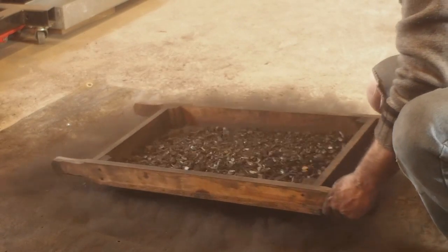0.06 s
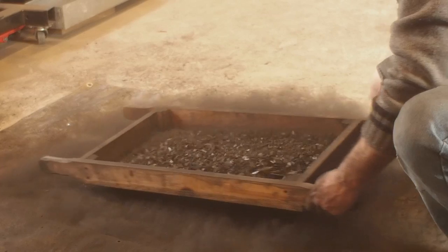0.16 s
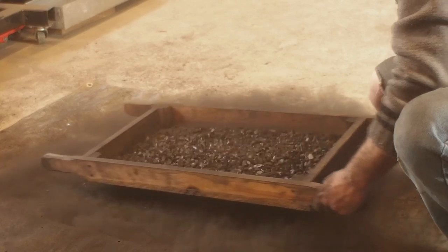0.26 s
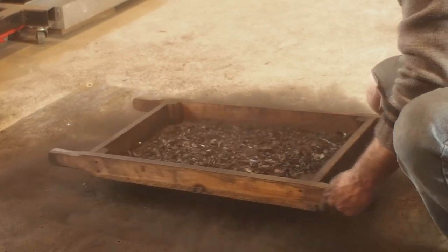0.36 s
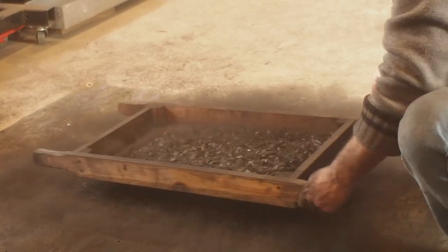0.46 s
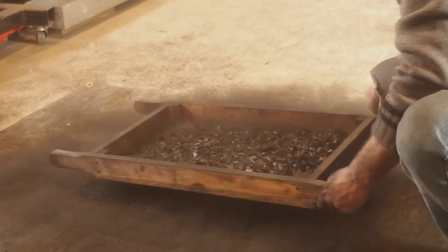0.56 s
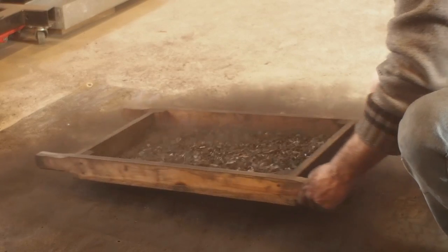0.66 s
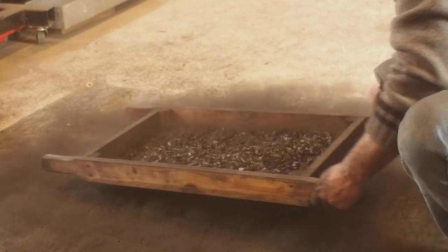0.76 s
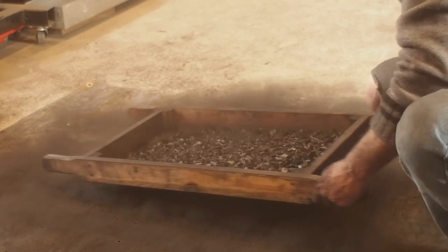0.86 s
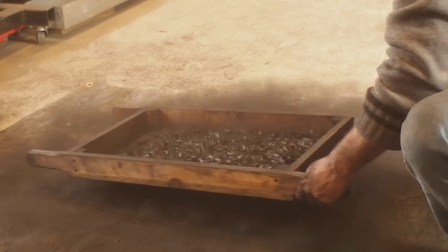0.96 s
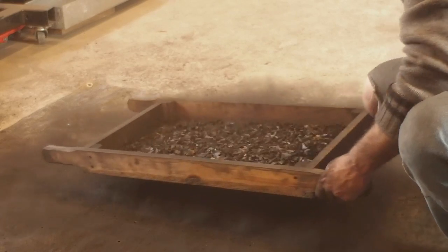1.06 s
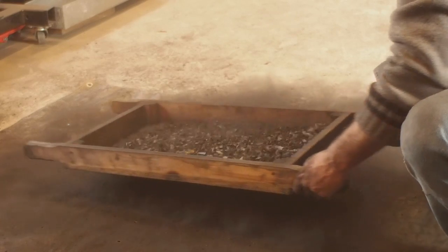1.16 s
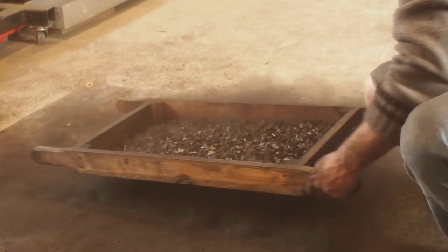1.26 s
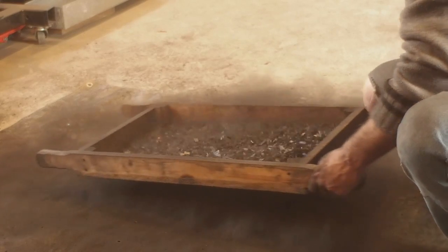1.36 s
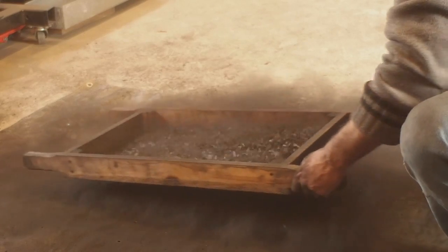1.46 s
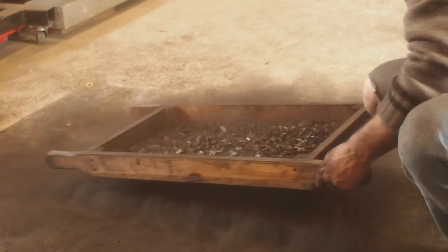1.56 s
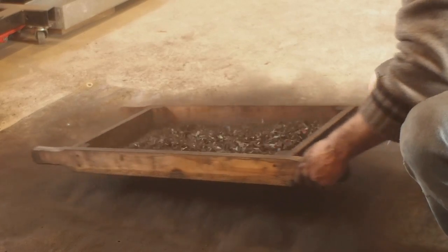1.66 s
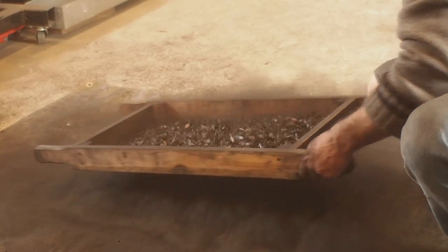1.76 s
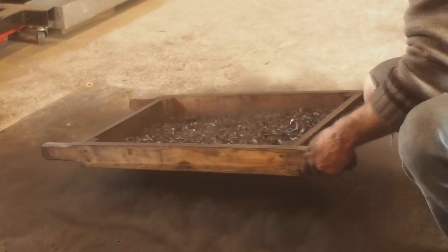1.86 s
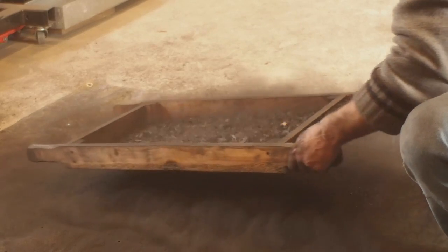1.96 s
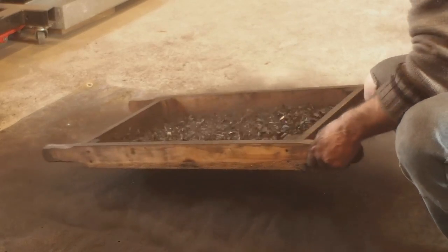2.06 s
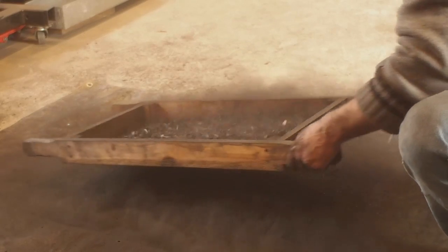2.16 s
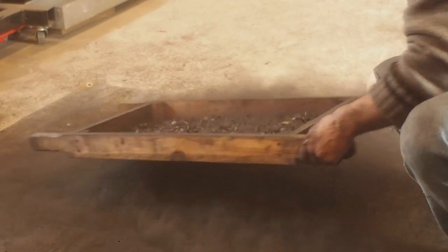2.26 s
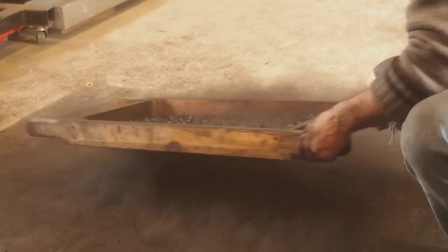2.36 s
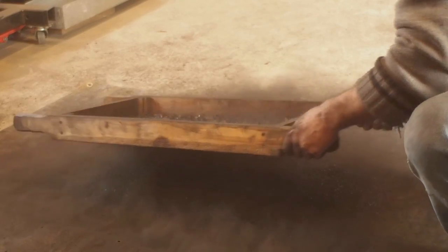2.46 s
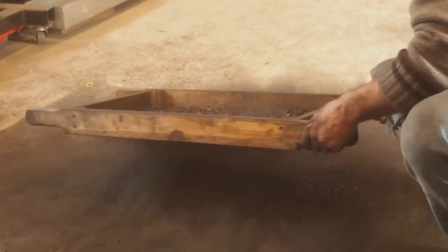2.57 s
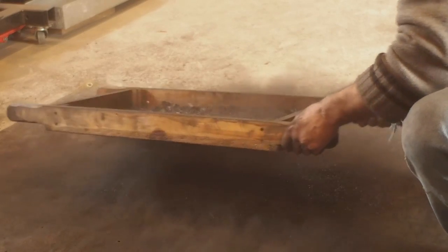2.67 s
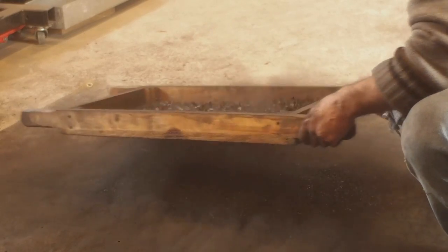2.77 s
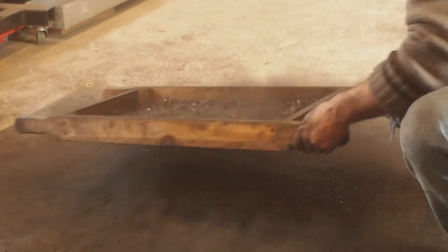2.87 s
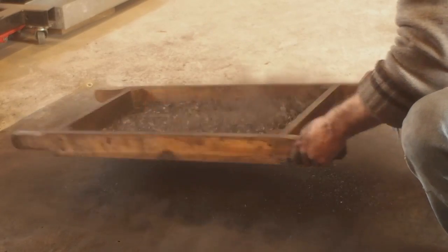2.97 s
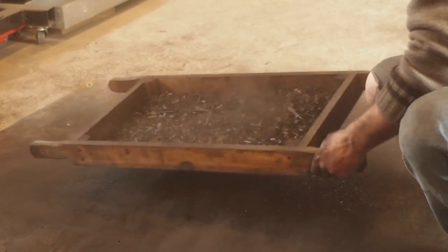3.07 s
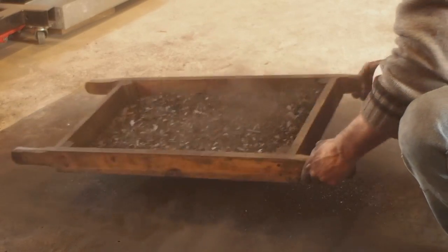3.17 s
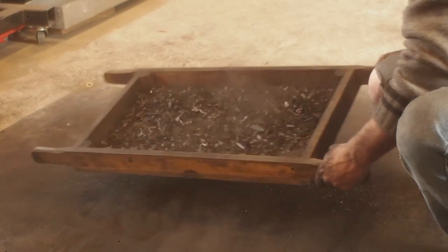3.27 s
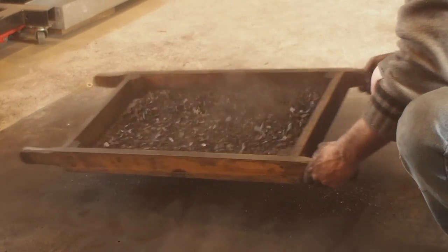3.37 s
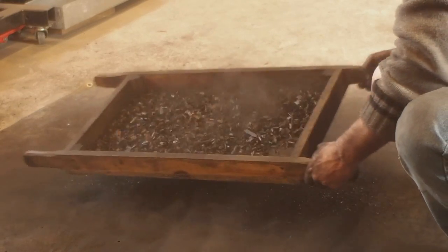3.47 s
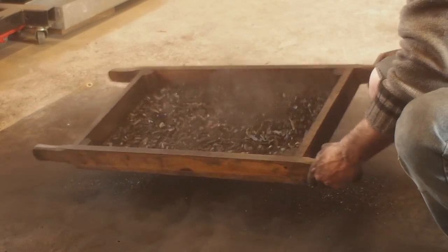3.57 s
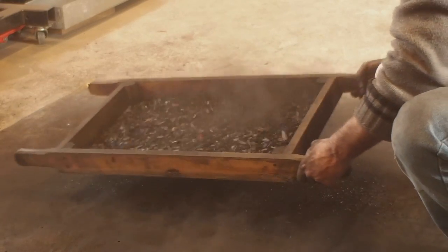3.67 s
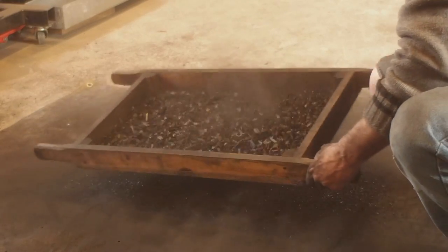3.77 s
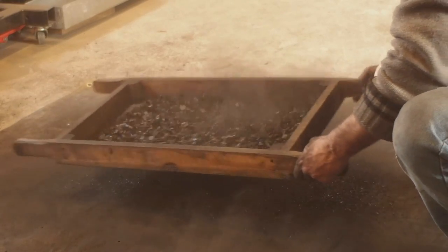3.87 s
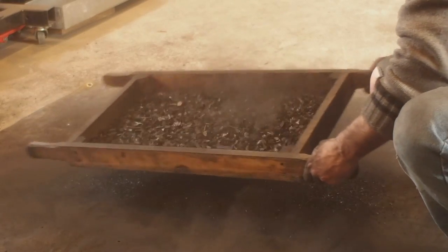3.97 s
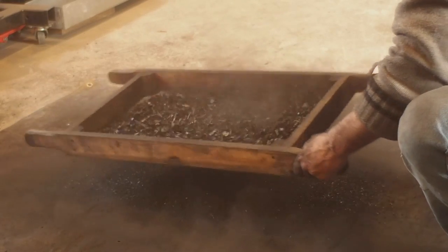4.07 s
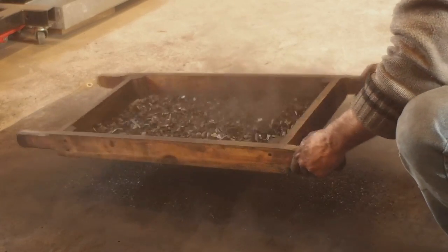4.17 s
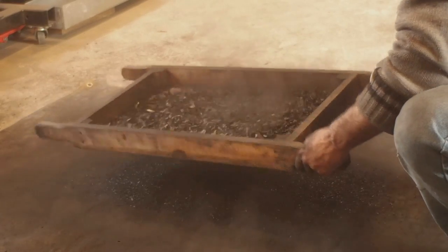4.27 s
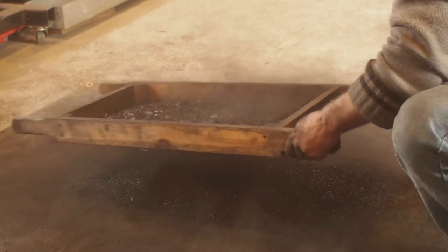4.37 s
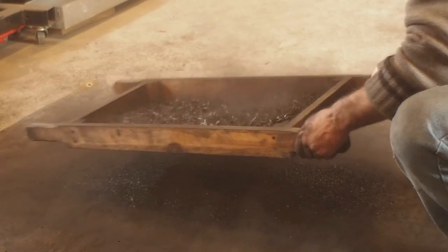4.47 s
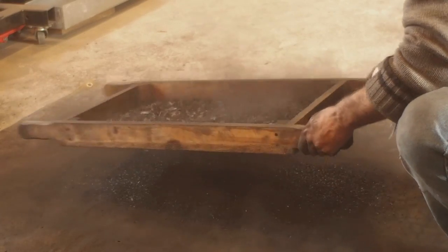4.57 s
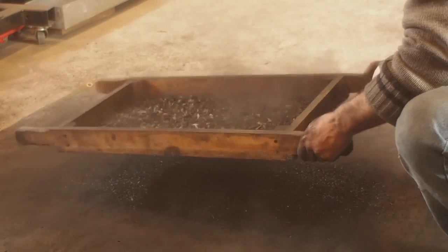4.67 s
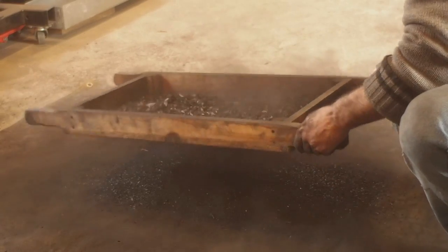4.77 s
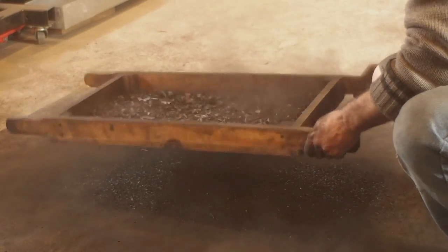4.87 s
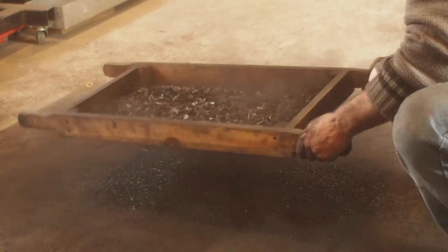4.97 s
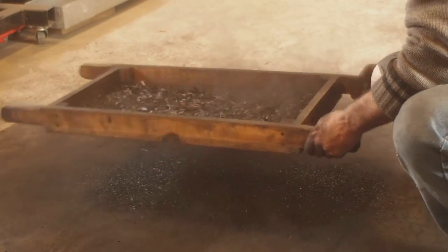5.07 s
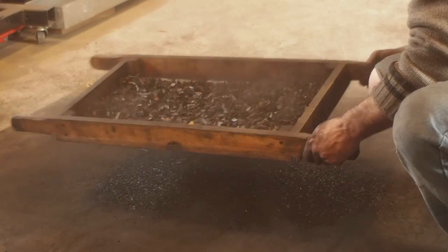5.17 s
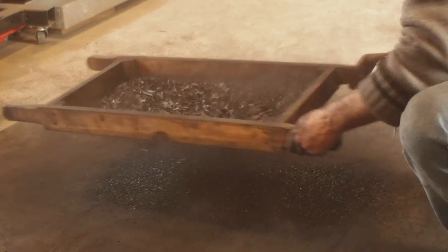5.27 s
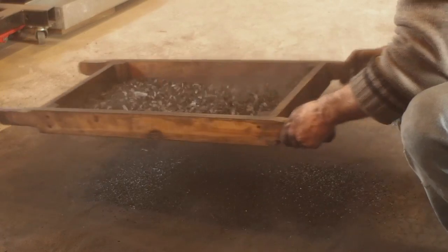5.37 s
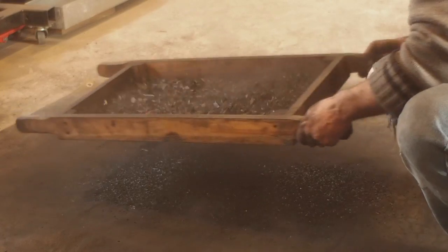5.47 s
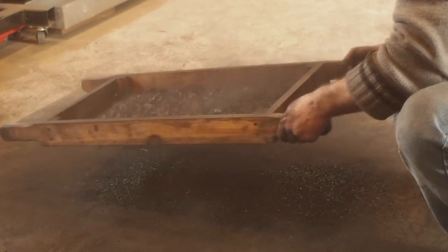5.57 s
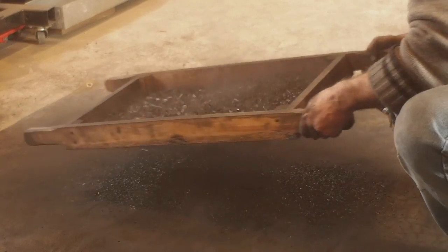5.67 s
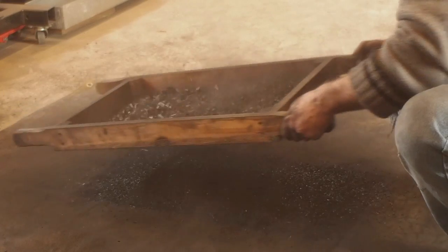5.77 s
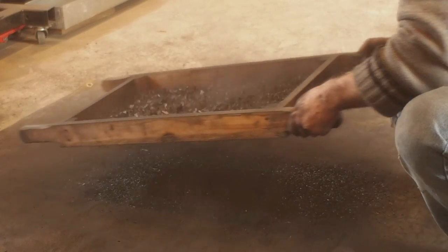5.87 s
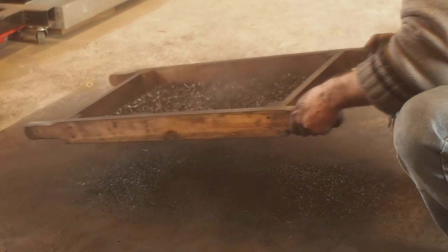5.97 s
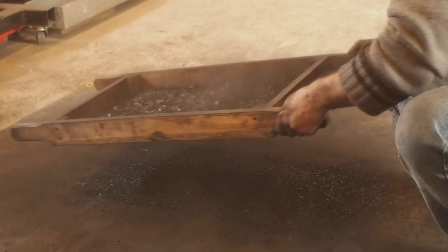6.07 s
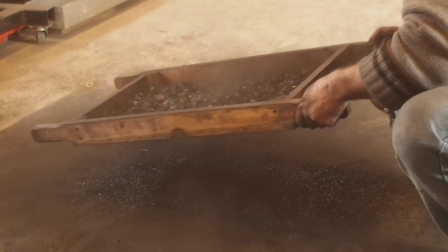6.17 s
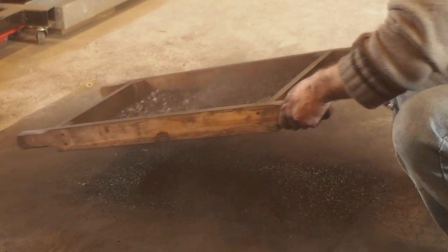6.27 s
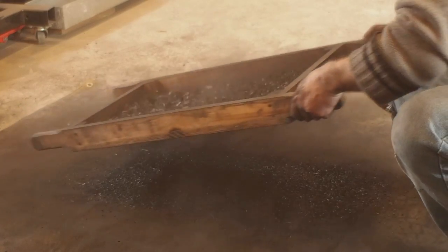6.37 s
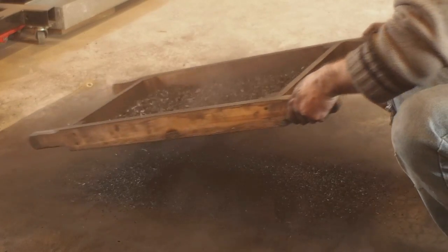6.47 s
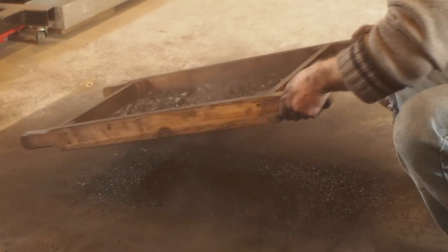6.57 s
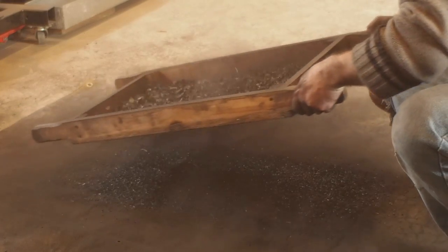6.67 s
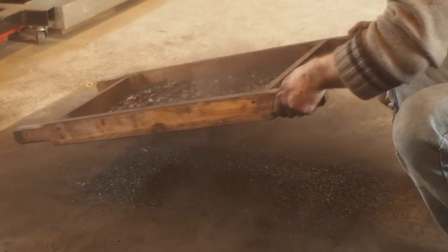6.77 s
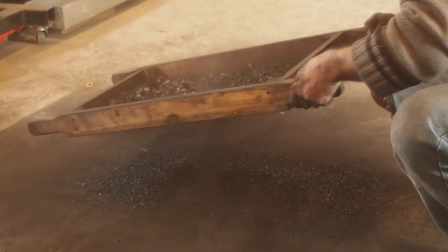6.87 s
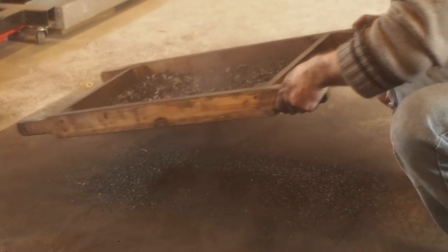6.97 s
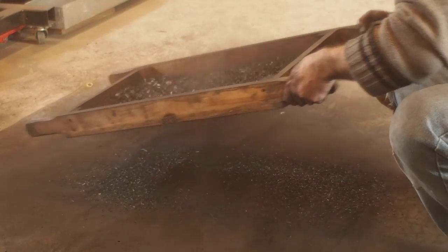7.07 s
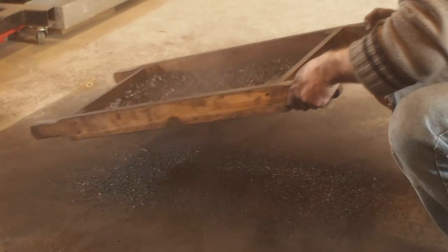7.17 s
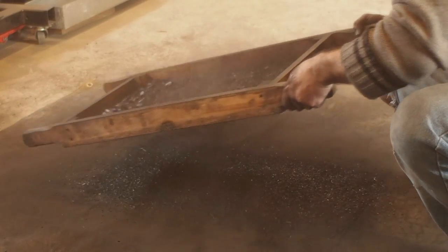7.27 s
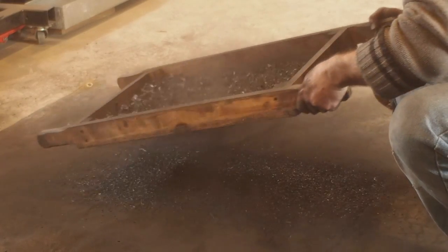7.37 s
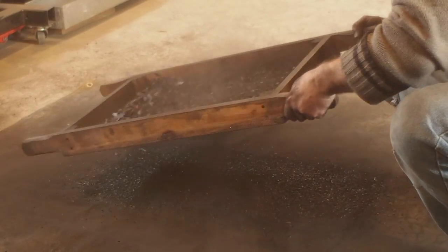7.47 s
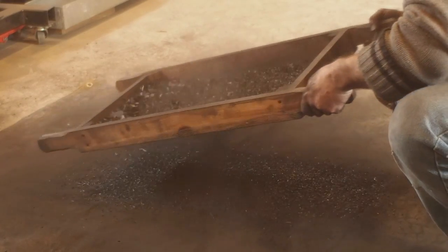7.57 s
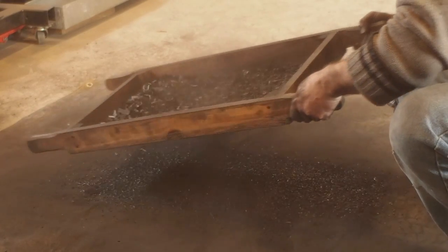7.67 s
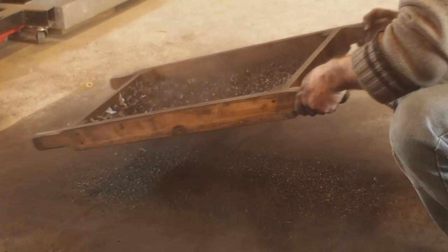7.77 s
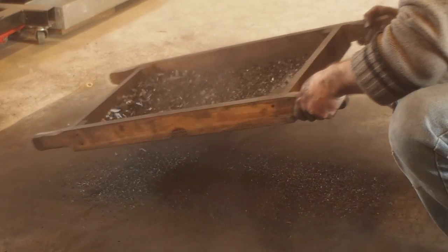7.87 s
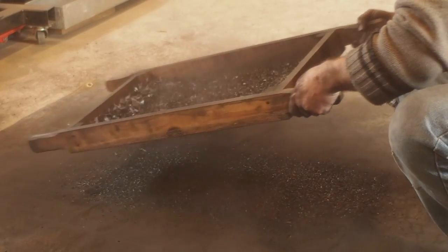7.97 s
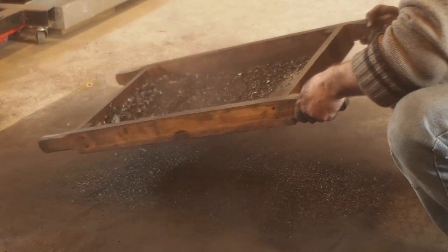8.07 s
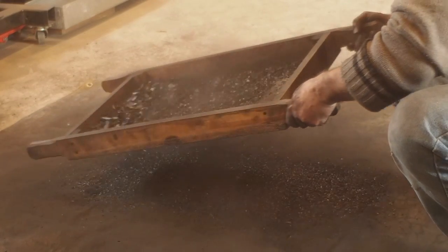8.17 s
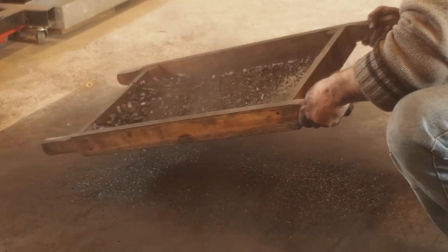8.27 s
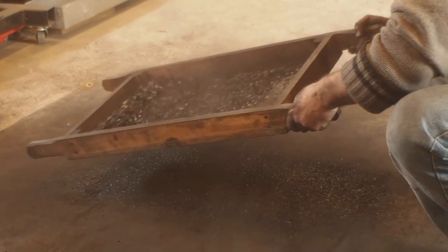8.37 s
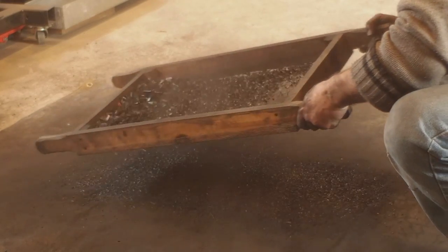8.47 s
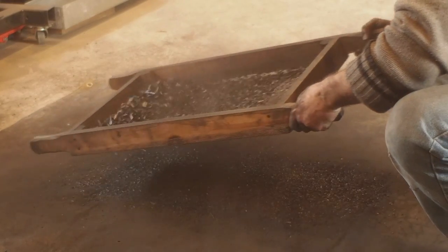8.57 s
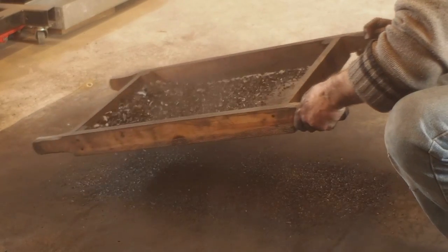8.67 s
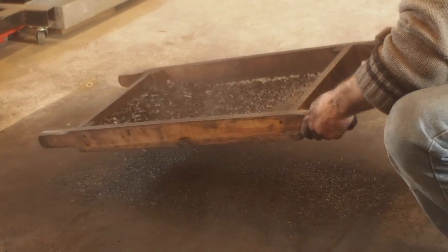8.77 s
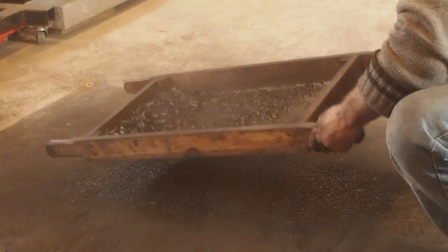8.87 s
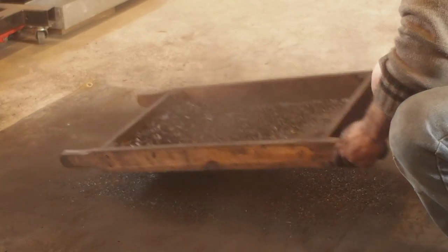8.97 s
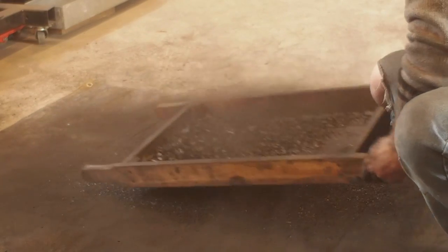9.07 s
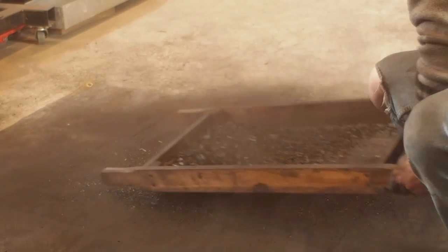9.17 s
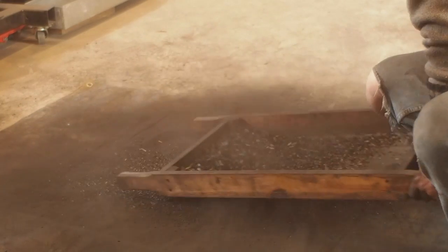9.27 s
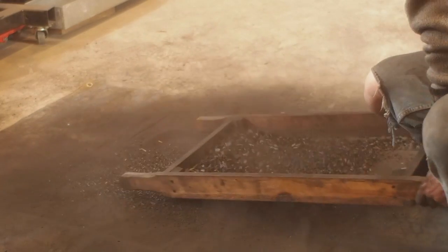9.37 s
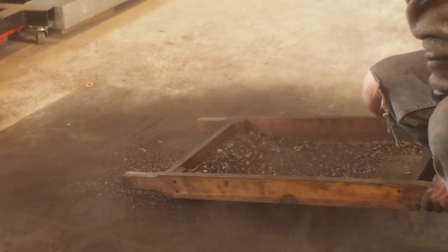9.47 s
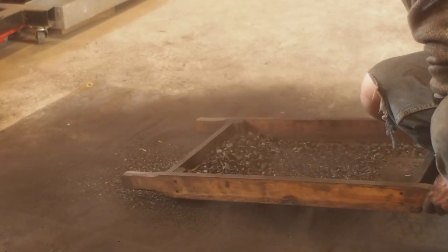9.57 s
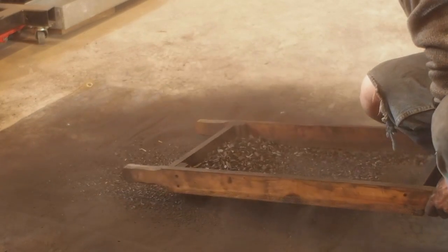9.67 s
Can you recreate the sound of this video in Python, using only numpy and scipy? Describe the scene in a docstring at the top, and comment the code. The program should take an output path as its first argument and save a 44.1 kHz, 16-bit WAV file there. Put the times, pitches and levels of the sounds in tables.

```python
"""Sieving charcoal in a workshop

Chopped charcoal is shaken in a wooden-framed sieve, about eight throws a second. Each throw sets off
a shower of collisions: lumps clink, fines hiss through the mesh, screen and frame ring. The shaking
stops, a few pieces tick, and the load slides once more as the sieve is lowered. Ventilation drones."""
import sys
import numpy as np
from scipy import signal
from scipy.fft import rfft, irfft
from scipy.io import wavfile

SR = 44100
rng = np.random.default_rng(int(sys.argv[2]) if len(sys.argv) > 2 else 0)


def transcribe(u):
    """Save the signal u as a 16-bit wav file named by the first command-line argument.

    u: samples, shape (n,) or (channels, n), limited to [-1, 1]; the rate is SR.
    q: integer samples, one column per channel.
    """
    v = np.clip(np.atleast_2d(u).T, -1, 1)
    q = np.round(v * 32767).astype(np.int16)
    wavfile.write(sys.argv[1], SR, q)


N = 429093
TIME = np.arange(N) / SR


def amp(db):
    """Decibels to gain."""
    return 10 ** (np.asarray(db) / 20)


def curve(points, t):
    """An automation curve's value at time t."""
    return np.interp(t, *np.transpose(points))


def spectrum_at(points, hz):
    """A spectrum's value at hz, on a log-frequency axis."""
    point_hz, value = np.transpose(points)
    return np.interp(np.log(hz + 1), np.log(point_hz + 1), value)


def coloured(x, eq, modes):
    """Minimum-phase filter of unit energy: a broad EQ curve with resonances on it."""
    hz = abs(np.fft.fftfreq(8192, 1 / SR))
    modes_db = sum(lift / (1 + (2 * (hz - pitch) / width) ** 2) for pitch, width, lift in modes)
    log_gain = np.log(amp(spectrum_at(eq, hz) + modes_db))
    response = np.exp(np.conj(signal.hilbert(log_gain)))
    ring = np.fft.ifft(response).real[:len(hz) // 2]
    return signal.oaconvolve(x, ring[None] / np.linalg.norm(ring), axes=1)[:, :N]


def band(x, low_hz, high_hz, passes=1):
    """A gentle band-pass, steeper with each pass."""
    sos = signal.butter(1, [low_hz, high_hz], "band", fs=SR, output="sos")
    return signal.sosfilt(np.tile(sos, (passes, 1)), x)


def clinks(low_hz, high_hz, sharpness, click, lag_s=3.2e-5, count=1500, size=192):
    """A palette of stereo clinks, (2, count, size): a click and a short ring each, white on average."""
    hz = np.fft.rfftfreq(size, 1 / SR) + 1
    register, ring_length, pan = rng.random((count, 3)).T[:, :, None]
    pitch_hz = low_hz * (high_hz / low_hz) ** register
    # rough faces touch at several points within a moment
    contact_decay = np.exp(-np.arange(size) / (SR * 0.00057))
    contact = rfft(rng.standard_normal((count, size)) * contact_decay) / np.sqrt(10)
    ring = 1 / (1 + 1j * sharpness * (.5 + ring_length) * (hz / pitch_hz - pitch_hz / hz))
    clink = click * contact + ring
    clink /= np.sqrt(np.mean(abs(clink) ** 2, 0))
    # each piece lies elsewhere on the screen, so it reaches one ear first
    ears = np.array([-.5, .5])[:, None, None]
    arrival_s = size / SR / 20 + ears * lag_s * rng.laplace(size=(count, 1))
    panned = clink * (1 + .5 * ears * (pan - .5))
    return irfft(panned * np.exp(-2j * np.pi * hz * arrival_s))


def shower(power, palette, per_s, spread_db, crowding=.25):
    """Random collisions: a harder shake brings both more of them and stronger ones."""
    chance = np.minimum(per_s / SR * (power / power.mean()) ** crowding, 1)
    onsets = np.flatnonzero(rng.random(N) < chance)
    piece = rng.integers(0, palette.shape[1], N)[onsets]
    heft_db = spread_db * np.clip(rng.standard_normal(N), -2, 2)
    blow = (amp(heft_db) * rng.choice([-1, 1], N))[onsets]
    force = blow / blow.std() * np.sqrt(power[onsets] / chance[onsets])
    samples = (onsets[:, None] + np.arange(palette.shape[2])).ravel()
    return np.array([np.bincount(samples, (force[:, None] * ear[piece]).ravel(), N)[:N]
                     for ear in palette])


# the sieve tips away from the hands: time_s, tilt (0-1)
SIEVE_TILT = [(0, 0.07), (5.3, 0), (6.3, .75), (8.3, 1)]
# the rhythm of the arms, one row a stroke: start_s, out_accent_db, back_accent_db
ARM_STROKES = [(-0.019, 1.5, 0), (0.233, 0, 1.5), (0.484, 0, -0.5), (0.727, 0, 1), (0.98, -1.0, 0.5),
               (1.229, 0.5, 0), (1.483, 1, 0.0), (1.736, 1, -1.5), (1.979, 1.0, -1.5), (2.224, 0, 0.0),
               (2.468, -1.0, 0), (2.714, -1.5, 0), (2.956, 1.0, -1.5), (3.205, 0, -1), (3.449, 0, -1.5),
               (3.682, 0.0, -1.5), (3.92, 0, -0.5), (4.171, 0.5, -0.5), (4.412, 1, 1.5), (4.66, -1.5, 2),
               (4.894, -0.5, 0.5), (5.128, 0, 0.5), (5.361, 1, 0.5), (5.598, 1, -2), (5.844, -1, -2.5),
               (6.083, 0, -4.5), (6.328, -0.5, -4.5), (6.57, -0.5, -4.5), (6.804, -1, -4.0),
               (7.037, 0, -3.5), (7.273, 0.0, -5.0), (7.501, -0.5, -4.5), (7.732, 0.0, -4.5),
               (7.958, 0.0, -6.5), (8.185, 0.0, -4.5), (8.409, 0.5, -3.5), (8.626, 1.5, -2)]
def throws(back_share=0.536, tilted_sooner_share=0.068):
    """Throw times and accents: the load flies out, and back half a stroke later, sooner when tilted."""
    out_s, out_db, back_db = np.transpose(ARM_STROKES)
    stroke_s = np.gradient(out_s)
    back_s = out_s + stroke_s * (back_share - tilted_sooner_share * curve(SIEVE_TILT, out_s))
    return np.r_[out_s, back_s], np.r_[out_db, back_db]


def surges(t, rise_s, fall_s, sliding_db, steepness=2.44):
    """Relative power: each throw swells and dies away over a bed of steady sliding."""
    throw_s, accent_db = throws()
    since_s = t - throw_s[:, None]
    width_s = np.where(since_s < 0, rise_s, fall_s)
    swells = np.exp(-.5 * abs(since_s / width_s) ** steepness)
    return amp(accent_db) ** 2 @ swells + amp(sliding_db) ** 2


# fader rides as effort and load change: time_s, lumps_db, fines_db, frame_db
SHAKE_EFFORT = [(0.0, -42.5, -42.5, -55.5), (0.45, -39.5, -39.5, -55), (1.3, -38, -38, -54.5),
                (1.85, -39.0, -38.0, -55.5), (2.25, -37.5, -37.0, -54.5), (2.95, -38.5, -38, -57.5),
                (3.4, -37, -35, -55), (4.2, -37, -36.5, -57), (4.7, -40.5, -38, -60),
                (5.05, -42.5, -38, -60), (5.35, -37.5, -34.5, -56), (6.0, -36.0, -34.5, -54.0),
                (6.45, -36.5, -35.5, -55), (7.25, -37.5, -36.5, -55), (7.7, -39, -37, -55.5),
                (8.35, -41, -39, -59), (8.65, -46, -44.5, -59.5), (8.82, -57, -53.5, -69)]
# the load shifts as the sieve stops and is lowered: centre_s, half_length_s, lumps_db, fines_db, frame_db
LOAD_SHIFTS = [(8.96, 0.021, -57, -60, -81), (9.1, 0.019, -59, -70, -78), (9.24, .022, -53, -53.5, -56),
               (9.356, 0.026, -50.5, -43, -58.5), (9.488, 0.05, -51, -54.5, -65),
               (9.72, .07, -59.5, -62, -65)]
def agitation():
    """Power envelopes of lumps, fines and frame: lumps stop soon after a throw, fines keep running."""
    t = TIME[::64]
    shaken = [surges(t, rise_s=0.036, fall_s=0.032, sliding_db=-10.5),
              surges(t, rise_s=0.031, fall_s=0.041, sliding_db=-8.5),
              surges(t, rise_s=0.032, fall_s=0.038, sliding_db=-11)]
    time_s, *effort_db = np.transpose(SHAKE_EFFORT)
    effort = amp([np.interp(t, time_s, db) for db in effort_db]) ** 2
    centre_s, half_length_s, *shift_db = np.transpose(LOAD_SHIFTS)
    slides = np.exp(-.5 * ((t - centre_s[:, None]) / half_length_s[:, None]) ** 2)
    shifting = amp(shift_db) ** 2 @ slides
    return [np.interp(TIME, t, power) for power in effort * shaken + shifting]


# the load heaps up and sounds deeper (+) or spreads over the screen (-): time_s, depth_db
HEAP_DEPTH = [(0, -1.5), (1.8, 0.5), (2.5, 3), (3.15, -.7), (4.05, 0.4), (4.4, 2.5), (5.3, 0.5), (5.9, 3),
              (6.3, 2.5), (7.6, 2.5), (8.5, 2), (9.2, 2)]
# resonances of screen and wooden frame, shared by all three showers: pitch_hz, width_hz, lift_db
SIEVE_MODES = [(197, 9.4, 16.5), (218, 16, -2), (440, 31, 12.5), (471, 11.4, 5), (636.5, 22, 10),
               (677.6, 18, 10), (702, 27, 7), (826, 16, 5.5), (1040, 18, 3.5), (1300, 17, 6), (1547, 60, 5),
               (1560, 12, -5), (1900, 150, 3), (2215, 110, -3), (2300, 190, 3), (2893, 83, 1),
               (3646, 65, 3.5), (4990, 330, 2)]
# the bright clatter of the lumps: frequency_hz, gain_db
LUMP_EQ = [(100, -47), (500, -30), (950, -12), (1250, -4), (1900, -1.5), (2900, 1.5), (3800, -1.5),
           (5000, -5), (8000, -15), (16000, -63)]
def lumps(power):
    """Coarse pieces clink against each other on the screen; a heap brings out their low notes."""
    short = clinks(low_hz=1101, high_hz=4940, sharpness=14.2, click=0.13)
    clatter = shower(power, short, per_s=6000, spread_db=1.0)
    # some lumps are hard and glassy, and ring for longer
    glassy = clinks(low_hz=1395, high_hz=4168, sharpness=74, click=0.0056, count=500, size=1024)
    ringing = shower(power, glassy, per_s=480, spread_db=3.0)
    hits = amp(-0.42) * clatter + amp(-5.5) * band(ringing, 1130, 5800, passes=2)
    depth_db = curve(HEAP_DEPTH, TIME)
    body = band(hits, 950, 1930)
    hits = body * amp(depth_db) + (hits - body) * amp(-.6 * depth_db)
    # a heap favours the screen's lower ring, a tilted sieve its upper one
    sway_db = 1.1 * depth_db - 2.5 * curve(SIEVE_TILT, TIME)
    lower_ring, upper_ring = band(hits, 2700, 3240), band(hits, 3380, 3770)
    hits = hits + lower_ring * (amp(sway_db) - 1) + upper_ring * (amp(-sway_db) - 1)
    return amp(-0.77) * coloured(hits, LUMP_EQ, SIEVE_MODES)


# larger chips among the fines pull their hiss lower: time_s, coarse_db
CHIP_COARSENESS = [(0, -1.5), (4.2, -1), (4.8, 0.5), (5.4, 1.5), (6, -1.5), (7.5, -2), (8.6, -2),
                   (9.7, 2.5)]
# the sizzle of the fines: frequency_hz, gain_db
FINES_EQ = [(200, -56), (1500, -31), (3000, -5.5), (4400, -1.5), (5600, -0.5), (7000, 1.5), (8300, 1),
            (9000, -1.5), (10000, -7.5), (12000, -17), (15600, -30)]
def fines(power):
    """Small chips and grit rattle through the mesh, all over the screen."""
    grit = clinks(low_hz=3500, high_hz=15130, sharpness=18.0, click=0.22, lag_s=4e-5)
    hiss = shower(power, grit, per_s=22000, spread_db=0.5)
    coarse_db = curve(CHIP_COARSENESS, TIME)
    chips = band(hiss, 3640, 5800)
    hiss = chips * amp(coarse_db) + (hiss - chips) * amp(-.4 * coarse_db)
    # nudge the top octave to the right, then the whole layer to the left
    hiss = hiss + band(hiss, 7300, 15000) * np.array([[-.2], [.2]])
    return amp([[.4], [-1.1]]) * coloured(hiss, FINES_EQ, SIEVE_MODES)


# the woody body of the sieve: frequency_hz, gain_db
FRAME_EQ = [(40, -25), (140, -23), (200, -7.5), (330, -5), (550, -2.5), (800, -1.5), (1100, -1),
            (1800, -13.5), (5000, -37)]
def frame(power):
    """Pieces landing on the screen drum it and the wooden frame."""
    knocks = clinks(low_hz=416, high_hz=1490, sharpness=2.1, click=0.33)
    drumming = shower(power, knocks, per_s=1800, spread_db=4.5)
    return amp(-0.1) * coloured(drumming, FRAME_EQ, SIEVE_MODES)


# the workshop's reverb time: frequency_hz, t60_s
ROOM_DECAY = [(200, 0.44), (1500, 0.31), (6000, 0.46), (15000, 0.26)]
def workshop(x, predelay_s=0.0043):
    """Scattered reflections from floor and walls; the highest treble dies first."""
    taps = rng.standard_normal((2, SR // 2)) * (rng.random((2, SR // 2)) < .1)
    taps *= TIME[:SR // 2] > predelay_s
    hz, t, spectra = signal.stft(taps, SR, nperseg=256)
    decay = amp(-60 * t / spectrum_at(ROOM_DECAY, hz)[:, None])
    _, tail = signal.istft(spectra * decay, SR, nperseg=256)
    return signal.oaconvolve(x, tail / np.linalg.norm(tail[0]), axes=1)[:, :N]


# the rush of the ventilation: frequency_hz, gain_db
AIR_EQ = [(20, -34), (42, -13), (60, -5.5), (100, -1.5), (140, -6.5), (200, 5), (300, 4), (450, 3.5),
          (700, -2), (1500, -2.5), (4000, -6), (8500, -22), (15600, -27)]
# its drone: pitch_hz, width_hz, lift_db
DRONE_MODES = [(188, 20, 4.4), (225.4, 18, 9.3)]
def ventilation(level_db=-61.0, width=0.55):
    """A steady bed of air noise with a low drone."""
    mid, side = rng.standard_normal((2, N))
    air = np.array([mid + width * side, mid - width * side])
    return amp(level_db) * coloured(air, AIR_EQ, DRONE_MODES)


# the soft low end under the scene: frequency_hz, gain_db
RUMBLE_EQ = [(20, -25), (42, -8), (62, -0.5), (110, 0.5), (190, 0.5), (300, -4), (800, -46)]
def rumble(level_db=-77, tilted_lift_db=6.5, width=0.11):
    """Low, nearly mono noise that swells as the sieve is tilted."""
    mid, side = rng.standard_normal((2, N))
    noise = coloured(np.array([mid + width * side, mid - width * side]), RUMBLE_EQ, [])
    return amp(level_db + tilted_lift_db * curve(SIEVE_TILT, TIME)) * noise


# dull handling bumps: centre_s, level_db, pitch_hz, half_length_s
HANDLING_BUMPS = [(2.617, -60, 176, .022), (7.19, -60.5, 400, 0.073), (7.25, -70, 75, .05),
                  (8.08, -67, 165, 0.089), (9.243, -58, 490, 0.024)]
def bumps():
    """Soft swells of low noise as the sieve is handled."""
    out = np.zeros(N)
    for centre_s, level_db, pitch_hz, half_length_s in HANDLING_BUMPS:
        near = abs(TIME - centre_s) < .3
        swell = np.exp(-.25 * ((TIME[near] - centre_s) / half_length_s) ** 2)
        thud = swell * band(rng.standard_normal(N)[near], pitch_hz / 1.5, pitch_hz * 1.5, passes=2)
        out[near] += amp(level_db) * thud * np.linalg.norm(swell) / np.linalg.norm(thud)
    return out


# single pieces drop or topple once the shaking stops: start_s, level_db, pitch_hz
SETTLING_TICKS = [(8.9087, -43, 4850), (8.9281, -44, 4580), (8.9685, -43, 2270), (9.0404, -40, 3520),
                  (9.0444, -44, 4700), (9.0818, -42, 2130), (9.1815, -45, 7650), (9.4325, -37, 2020),
                  (9.5048, -39, 3200), (9.5454, -39, 1870)]
def ticks(ring_s=.0025, snap_s=.0013, size=600):
    """Each piece lands with a brittle snap and a brief ring."""
    out, t = np.zeros((2, N + size)), np.arange(size) / SR
    brittle = signal.butter(3, [2200, 7800], "band", fs=SR, output="sos")
    for start_s, level_db, pitch_hz in SETTLING_TICKS:
        ring = np.sin(2 * np.pi * pitch_hz * t + rng.random((2, 1))) * np.exp(-t / ring_s)
        noise = rng.standard_normal(size) + .4 * rng.standard_normal((2, size))
        snap = signal.sosfilt(brittle, noise * np.exp(-t / snap_s))
        start = round(start_s * SR)
        out[:, start:start + size] += amp(level_db) * (.28 * ring + 1.05 * snap / abs(snap).max())
    return out[:, :N]


# brief gritty scrapes near the end: centre_s, half_length_s, level_db, pitch_hz, width (share of pitch)
GRIT_SCRAPES = [(9.352, 0.022, -59, 5200, .5), (9.403, 0.015, -52.5, 1960, 0.13),
                (9.5, 0.07, -64, 1810, 0.14)]
def scrapes(catches_per_s=3000):
    """Grit slips in quick catches that ring one resonance per scrape."""
    out = np.zeros((2, N))
    catches = rng.standard_normal(N) * (rng.random(N) < catches_per_s / SR)
    for centre_s, half_length_s, level_db, pitch_hz, width in GRIT_SCRAPES:
        near = abs(TIME - centre_s) < .2
        slips = catches[near] * (1 + .5 * rng.standard_normal((2, near.sum())))
        rasp = band(slips, pitch_hz / (1 + width), pitch_hz * (1 + width), passes=2)
        swell = np.exp(-.25 * ((TIME[near] - centre_s) / half_length_s) ** 2)
        out[:, near] += amp(level_db) * rasp / rasp.std() * swell
    return out


def scene():
    """The mix: the sieve up close, a little room, and a bed of air and rumble."""
    lump_power, fines_power, frame_power = agitation()
    sieve = lumps(lump_power) + fines(fines_power) + frame(frame_power) + ticks() + bumps() + scrapes()
    return amp(-1.12) * sieve + amp(-12.0) * workshop(sieve) + ventilation() + rumble()


def record(dry):
    """A steep high cut on the whole mix."""
    high_cut = signal.firwin(511, cutoff=15650, window=("kaiser", 9), fs=SR)
    return signal.oaconvolve(dry, high_cut[None], "same", axes=1)


dry = scene()
out = record(dry)
transcribe(out)
```